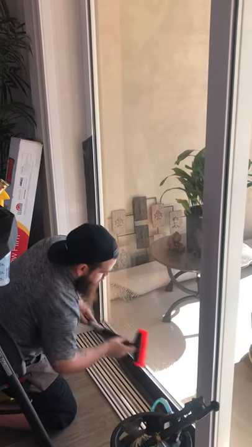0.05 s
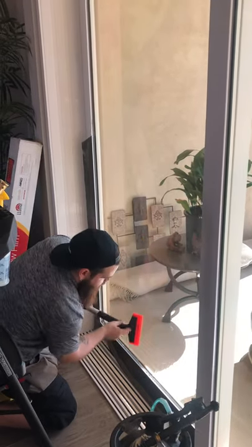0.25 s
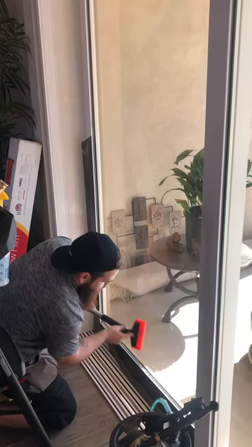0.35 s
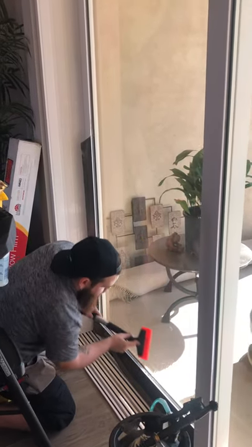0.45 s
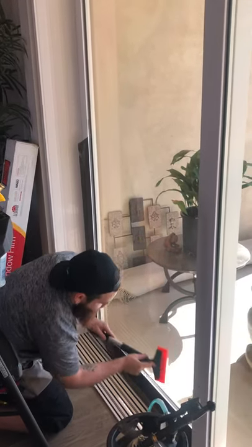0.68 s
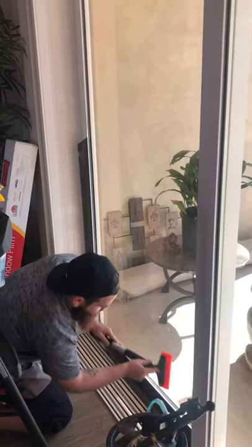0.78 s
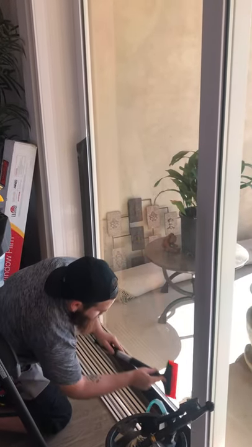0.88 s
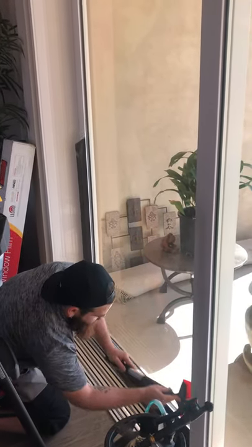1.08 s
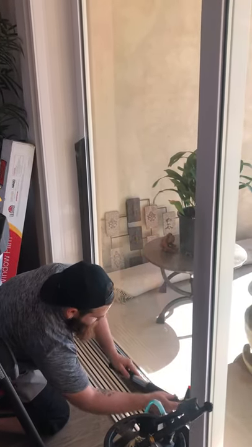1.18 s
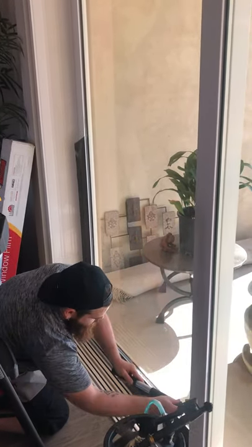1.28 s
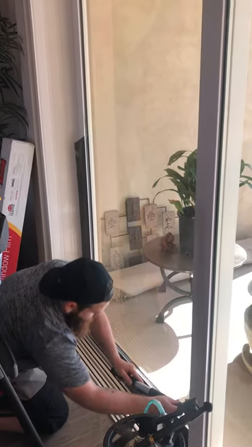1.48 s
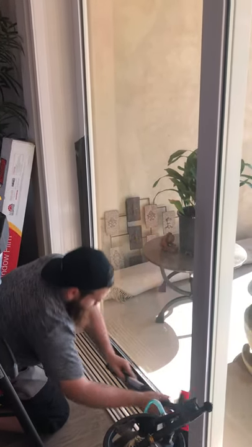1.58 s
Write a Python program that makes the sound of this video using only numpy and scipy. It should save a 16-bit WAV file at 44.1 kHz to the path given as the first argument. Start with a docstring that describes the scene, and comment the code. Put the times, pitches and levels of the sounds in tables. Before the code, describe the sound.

A hand tool knocks once on a glass door frame, and the pane and room ring briefly. Faint clothing rustles follow, then a few soft, dull bumps and the start of a light scrape, in a quiet room.

```python
"""A hand tool knocks once on the frame of a glass door: a crack, then frame, pane and room ring on.
Around it, in the quiet room, the worker's clothes rustle and hand and tool make light touches.
The frame takes a soft thump in a few dull bumps, and something starts to scrape along the metal
track, its friction exciting the track's resonances."""
import sys
import numpy as np
from scipy import signal
from scipy.fft import irfft
from scipy.io import wavfile
from scipy.ndimage import uniform_filter1d

SR = 44100
rng = np.random.default_rng(int(sys.argv[2]) if len(sys.argv) > 2 else 0)


def int16_out(signal):
    """Quantize to a 16-bit WAV file."""
    q = np.round(np.clip(np.atleast_2d(signal).T, -1, 1) * 32767)
    wavfile.write(sys.argv[1], SR, q.astype(np.int16))


N = 72765
TIME_S = np.arange(N) / SR
FREQ_HZ = np.fft.rfftfreq(N, 1 / SR)


def amp(db):
    """Decibels to gain."""
    return 10 ** (np.asarray(db) / 20)


def unit_rms(x):
    """Scales to rms 1."""
    return x / np.sqrt(np.mean(x ** 2) + 1e-20)


def lookup(table, hz, column=1):
    """Interpolates a table column over log frequency."""
    columns = np.transpose(table)
    return np.interp(np.log(hz + 1), np.log(columns[0] + 1), columns[column])


def add(mix, start_s, sound):
    """Adds a sound to the mix in place."""
    part = mix[round(start_s * SR):][:len(sound)]
    part += sound[:len(part)]


def noise(gain):
    """Steady noise of rms 1, shaped by a gain per frequency."""
    phases = np.exp(2j * np.pi * rng.random(len(FREQ_HZ)))
    return unit_rms(irfft(gain * phases, N))


def coloured_noise(spectrum):
    """Noise of rms 1, shaped by a spectrum table."""
    return noise(amp(lookup(spectrum, FREQ_HZ)))


def resonant_noise(hz, width_hz):
    """Noise of rms 1 through one resonance."""
    return noise(1 / (1 + ((FREQ_HZ - hz) / width_hz) ** 2))


def grain(depth_db):
    """Quick, bounded swings of gain as surfaces catch and slip."""
    swing = unit_rms(uniform_filter1d(rng.standard_normal(N), size=130))
    return unit_rms(amp(depth_db * np.tanh(swing)))


def strike(rise_s, t60_s, delay_s=0):
    """Envelope of a blow: linear rise, exponential decay."""
    age_s = np.maximum(TIME_S - delay_s, 0)
    return np.minimum(age_s / rise_s, 1) * amp(-60 * age_s / t60_s)


def dense_ring(table, rise_s, delay_s_per_octave=0):
    """Close modes as noise bands, each with its own decay; low bands can arrive later."""
    band_count, undelayed_above_hz = 22, 3530
    centres_hz = np.geomspace(30, 16000, band_count)
    band_position = np.interp(np.log(FREQ_HZ + 1), np.log(centres_hz), np.arange(band_count))
    colour = amp(lookup(table, FREQ_HZ))
    colour /= np.linalg.norm(colour)
    out = np.zeros(N)
    for k, hz in enumerate(centres_hz):
        band = colour * np.sqrt(np.maximum(1 - abs(band_position - k), 0))
        delay_s = delay_s_per_octave * max(np.log2(undelayed_above_hz / hz), 0)
        envelope = strike(rise_s, lookup(table, hz, column=2), delay_s)
        band_rms = np.linalg.norm(band) * np.sqrt(np.mean(envelope ** 2))
        out += band_rms * unit_rms(noise(band) * envelope)
    return out


def modal_ring(modes, rise_s, phase_spread_cycles=1):
    """Separate modes as decaying sines."""
    out = np.zeros(N)
    for hz, db, t60_s in modes:
        cycles = hz * TIME_S + phase_spread_cycles * rng.random()
        out += amp(db) * strike(rise_s, t60_s) * np.sin(2 * np.pi * cycles)
    return out


# Still room air (frequency [Hz], relative level [dB])
AIR_SPECTRUM = [(20, -25), (35, -1), (55, 4.5), (100, 1.5), (170, -3), (300, -4.5), (500, -10), (1000, -15),
                (2500, -19.5), (6000, -25.5), (12000, -30), (16000, -28.5)]


def room():
    """Low room noise with a faint wavering hum."""
    air = amp(-63.5) * coloured_noise(AIR_SPECTRUM)
    hum = amp(-69.5) * resonant_noise(hz=249.6, width_hz=30)
    return air + hum


# Cloth strokes (peak time [s], level [dB], rise [s], fall [s])
CLOTH_STROKES = [(.135, -62.5, 0.054, 0.19), (.62, -65.5, 0.068, 0.045), (.715, -64, 0.063, 0.051),
                 (1.05, -67.5, 0.026, 0.089), (1.16, -59.5, 0.024, 0.076), (1.275, -63.5, 0.038, 0.053)]
# Rubbing cloth (frequency [Hz], relative level [dB])
CLOTH_SPECTRUM = [(100, -32.5), (300, 3), (700, -1.5), (1800, -0.5), (3000, -4.5), (5000, -5.5),
                  (8000, -13), (16000, -20.5)]


def clothes():
    """Each movement rubs cloth: grainy noise that swells and fades."""
    power = np.zeros(N)
    for peak_s, db, rise_s, fall_s in CLOTH_STROKES:
        swell = np.exp(-((TIME_S - peak_s) / rise_s) ** 2)
        fade = np.exp(-abs(TIME_S - peak_s) / fall_s)
        power += amp(db) ** 2 * np.where(TIME_S < peak_s, swell, fade)
    return np.sqrt(power) * grain(depth_db=1) * coloured_noise(CLOTH_SPECTRUM)


# First crack of the frame (frequency [Hz], relative level [dB], t60 [s])
CRACK_BANDS = [(100, -26, 0.098), (400, -7, 0.067), (855, 5, 0.047), (1360, 1.5, .045),
               (1770, -13.5, 0.067), (3140, -11, 0.16), (5270, -26, 0.087), (11200, -28, 0.09),
               (16000, -38, 0.067)]
# Dense ring of pane and room (frequency [Hz], relative level [dB], t60 [s])
TAIL_BANDS = [(30, -12, 0.72), (55, -2.5, 1.22), (113, -1.5, 1.46), (214, -8, 1.17), (348, -3.5, 0.77),
              (520, -1.5, 0.67), (660, -3, 0.82), (850, -5.5, 0.94), (1500, -13, 0.96), (1830, -18, 0.89),
              (2400, -19.5, 0.96), (2940, -15.5, 0.99), (3720, -21.5, 0.89), (5370, -28.5, 0.79),
              (8700, -30.5, 0.51), (16000, -41.5, 0.34)]
# Modes of frame, pane and room (frequency [Hz], relative level [dB], t60 [s])
DOOR_MODES = [(53.4, -6, 1.2), (71.6, -9.5, 1.47), (97.5, -14, 0.9), (112.3, -13, 0.82),
              (175.7, -9.5, 1.69), (247, -6, 0.93), (312.3, -5, 1.04), (349.5, -2, 0.78),
              (365.5, -2.5, 0.82), (402.5, -6.5, 0.48), (456, -4, 0.73), (486.4, 0.5, 0.59),
              (512, -0.5, 0.51), (640, 0, 0.33), (664, 0, 0.32), (744.5, -6, 0.79), (852, 2.5, 0.23),
              (963.5, 0, 0.29), (2670, -6.5, 0.26), (3247, -17, 0.37)]
# Tool contacts (time after knock [s], relative level [dB])
TOOL_CONTACTS = [(.0004, 2), (.0038, 1), (.0092, -14)]
# Tick of one contact (frequency [Hz], relative level [dB])
TICK_SPECTRUM = [(300, -30), (1800, 6.5), (3200, 2.5), (4400, 2.5), (5500, -13), (9500, -8), (12000, -16),
                 (16000, -20)]


def knock(start_s=0.2328):
    """The tool lands and chatters; the frame cracks and rings on with pane and room."""
    # Lower bending waves travel slower.
    crack = amp(-24.5) * dense_ring(CRACK_BANDS, rise_s=0.0011, delay_s_per_octave=0.0014)
    tail = amp(-36.5) * dense_ring(TAIL_BANDS, rise_s=0.02)
    modes = amp(-39) * modal_ring(DOOR_MODES, rise_s=0.0068)
    blow = crack + tail + modes
    for contact_s, db in TOOL_CONTACTS:
        tick = strike(rise_s=0.00012, t60_s=0.013) * coloured_noise(TICK_SPECTRUM)
        add(blow, contact_s, amp(db - 30.5) * tick)
    out = np.zeros(N)
    add(out, start_s, blow)
    return out


# Touches and brushes (time [s], level [dB], centre [Hz], width [octaves], rise [s], t60 [s])
LIGHT_TOUCHES = [(.455, -70, 12800, .25, .015, .4), (.71, -62, 3000, 1.1, .004, 0.16),
                 (1.135, -57.5, 2560, 0.75, 0.036, .4), (1.265, -61.5, 11700, 0.16, .002, 0.11),
                 (1.267, -60, 4500, 0.32, 0.0018, 0.11), (1.2945, -53.5, 840, 0.74, 0.0027, 0.099)]


def touches():
    """Light contacts of hand and tool, each a short burst of band noise."""
    out = np.zeros(N)
    for start_s, db, centre_hz, width_octaves, rise_s, t60_s in LIGHT_TOUCHES:
        offset_octaves = np.log2((FREQ_HZ + 1) / centre_hz)
        band = np.exp(-0.5 * (offset_octaves / width_octaves) ** 2)
        add(out, start_s, amp(db) * strike(rise_s, t60_s) * noise(band))
    return out


# Soft bumps on the frame (time [s], relative level [dB], rise [s])
BUMPS = [(1.3038, 2.5, 0.0015), (1.334, -9.5, 0.0028), (1.3634, -2, 0.0028), (1.469, -6.5, .014)]
# Dull thud of a bump (frequency [Hz], relative level [dB], t60 [s])
THUD_BANDS = [(30, -45, 0.23), (73, 3, 0.81), (141, 0, 0.16), (263, -11, 0.66), (360, -6.5, 0.44),
              (555, -20.5, 0.37), (1400, -34, .2), (4000, -55, 0.087)]
# Sill modes (frequency [Hz], relative level [dB], t60 [s])
SILL_MODES = [(131, 0, .22), (261, -4, .15)]


def thumps():
    """A soft weight settles on the sill in a few dull bumps, ringing its low modes."""
    out = np.zeros(N)
    for start_s, db, rise_s in BUMPS:
        thud = amp(-48) * dense_ring(THUD_BANDS, rise_s)
        sill = amp(-40) * modal_ring(SILL_MODES, rise_s, phase_spread_cycles=0)
        add(out, start_s, amp(db) * (thud + sill))
    return out


# Scrape envelope (time [s], level [dB])
SCRAPE_ENVELOPE = [(1.54, -85), (1.576, -65), (1.61, -62.5), (1.65, -62.5)]
# Track resonances (frequency [Hz], width [Hz], relative level [dB], peak time [s], swell [s])
TRACK_RESONANCES = [(1120, 44, 2.5, 1.609, 0.013), (2200, 310, -6, 1.63, 0.058),
                    (3190, 130, -2.5, 1.63, 0.047), (5120, 270, -1.5, 1.645, .027),
                    (7440, 300, -9, 1.64, 0.026), (8150, 300, -8, 1.645, 0.034),
                    (10950, 270, -13, 1.64, 0.028)]
# Friction hiss (frequency [Hz], relative level [dB])
HISS_SPECTRUM = [(60, -1), (260, 6), (550, -15), (1100, -5), (2500, -16), (4300, -17.5), (8000, -26),
                 (16000, -29)]


def scrape():
    """Growing friction hisses and excites the narrow resonances of the metal track."""
    times_s, levels_db = np.transpose(SCRAPE_ENVELOPE)
    envelope = amp(np.interp(TIME_S, times_s, levels_db)) * (TIME_S > times_s[0])
    singing = np.zeros(N)
    for hz, width_hz, db, peak_s, swell_s in TRACK_RESONANCES:
        swell = np.exp(-((TIME_S - peak_s) / swell_s) ** 2)
        singing += amp(db) * swell * resonant_noise(hz, width_hz)
    friction = envelope * grain(depth_db=3.5)
    hiss = amp(4) * coloured_noise(HISS_SPECTRUM)
    return friction * (singing + hiss)


def scene():
    """All sources in one channel."""
    return (room() + clothes() + knock() + touches() + thumps() + scrape())[None]


def record(dry):
    """Microphone low cut, then a steep band limit."""
    low_cut_hz, band_limit_hz = 38, 15950
    highpass = signal.butter(4, low_cut_hz, btype="high", fs=SR, output="sos")
    lowpass = signal.firwin(511, band_limit_hz, window=("kaiser", 9), fs=SR)
    return signal.oaconvolve(signal.sosfilt(highpass, dry), lowpass[None], "same")


dry = scene()
out = record(dry)
int16_out(out)
```